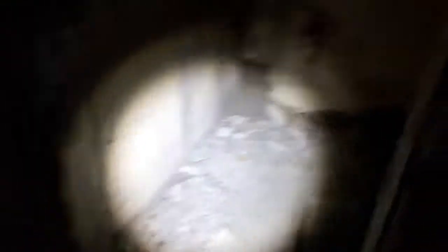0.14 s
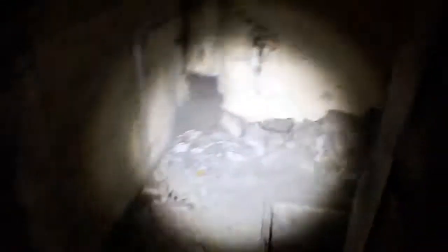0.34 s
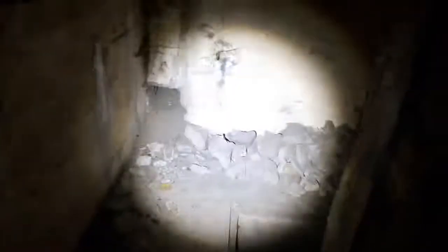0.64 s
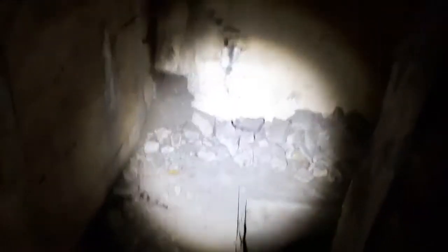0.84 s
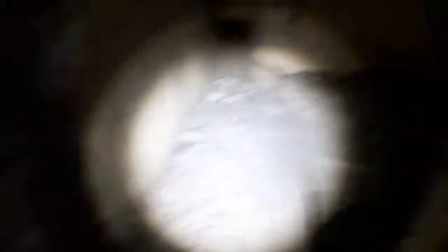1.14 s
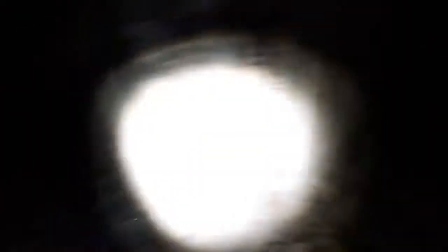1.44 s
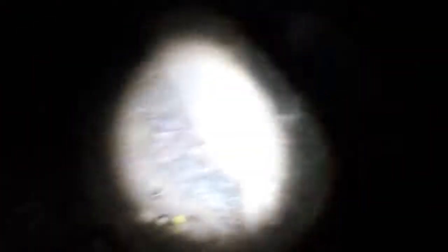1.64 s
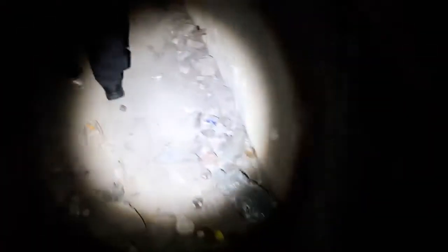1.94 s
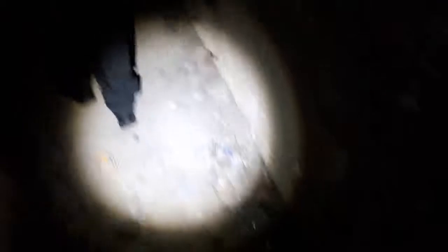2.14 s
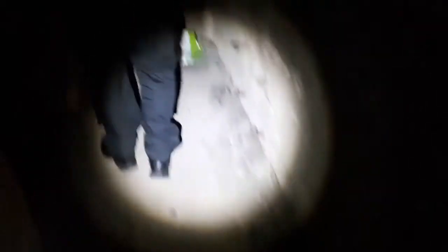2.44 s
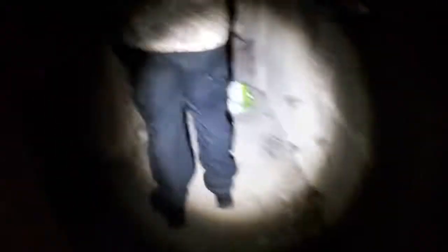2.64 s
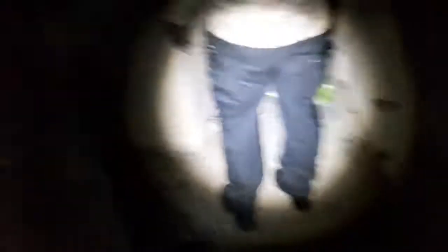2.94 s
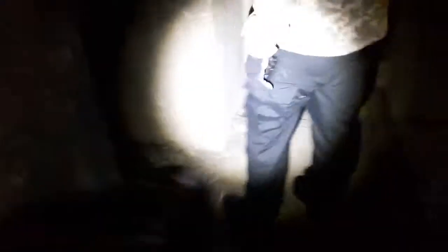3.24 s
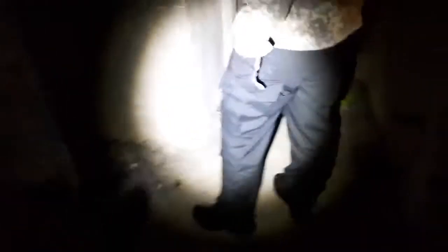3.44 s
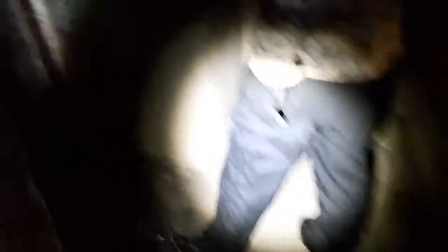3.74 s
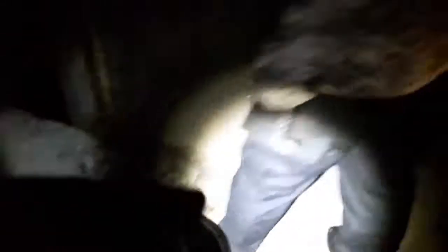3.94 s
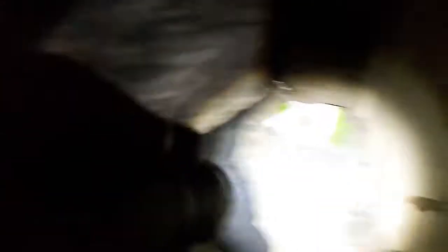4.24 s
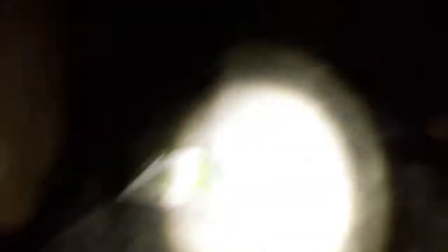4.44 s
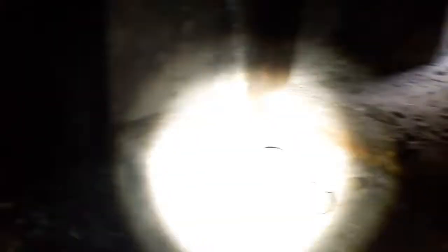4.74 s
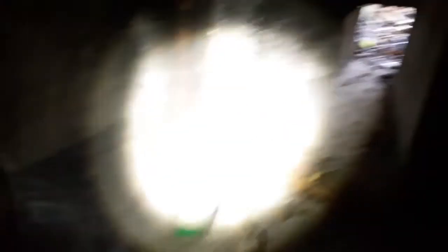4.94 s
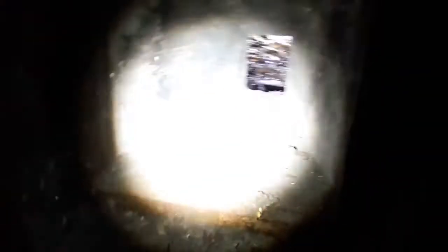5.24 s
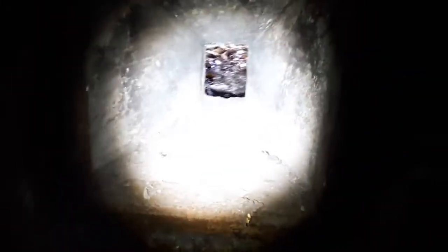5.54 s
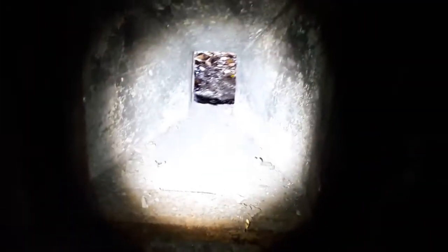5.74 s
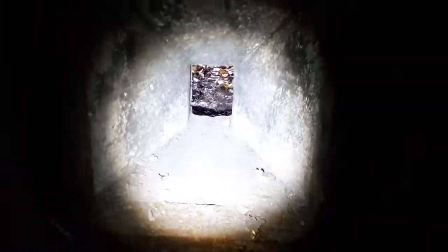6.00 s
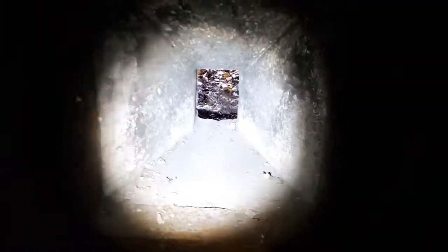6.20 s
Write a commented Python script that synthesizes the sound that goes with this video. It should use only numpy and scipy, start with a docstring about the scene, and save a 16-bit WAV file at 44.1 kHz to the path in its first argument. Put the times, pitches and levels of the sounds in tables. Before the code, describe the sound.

Two people scuff across gritty debris in an echoing concrete room, stones cracking and knocking underfoot over faint rustle and a deep wavering hum.

```python
"""Two people pick their way over rubble in a concrete bunker, one of them holding the microphone.
From the start soles grind grit (random grains), chips snap (noise bursts with a ring) and slabs
knock (struck modes); a sole first slips before 1 s. Dull taps lead into the densest rubble, about
2.7 to 4.1 s, then hard clacks (a click and chatter) come close by and the last steps are fainter.
Bare walls answer the debris; fine rustle and a low hum (two tones over a rumble) run throughout."""
import sys
import numpy as np
from scipy import signal
from scipy.fft import rfft, irfft
from scipy.io import wavfile
from scipy.ndimage import uniform_filter1d

SR = 44100
rng = np.random.default_rng(int(sys.argv[2]) if len(sys.argv) > 2 else 0)


def generate_wav(signal):
    """Clip the signal to [-1, 1] and save it as 16-bit WAV at the path in sys.argv[1]."""
    frames = np.transpose(np.atleast_2d(signal))
    scaled = np.clip(frames, -1, 1) * 32767
    pcm = np.round(scaled).astype(np.int16)
    wavfile.write(sys.argv[1], SR, pcm)


N = 280917

PORT_GAP_M = 0.15  # between the two microphone ports
SOUND_M_PER_S = 343


def undb(db):
    """Decibels to gain."""
    return 10 ** (np.asarray(db) / 20)


def unit(x):
    """Scale to rms 1."""
    return x / np.sqrt(np.mean(x ** 2))


def seconds(size):
    """A time axis."""
    return np.arange(size) / SR


def curve(rows):
    """The gain over time of (t/s, level/dB) points."""
    return undb(np.interp(seconds(N), *np.transpose(rows)))


def walk(rate):
    """Random levels of rms near 1, held 1 / rate s and smoothed twice over that time."""
    hold = int(SR / rate)
    levels = np.repeat(rng.standard_normal(N // hold + 1), hold)
    smooth = uniform_filter1d(uniform_filter1d(levels, hold), hold)
    return unit(smooth[:N])


def paint(x, colour, size=4096):
    """Causal minimum-phase filter with the gains of (f/Hz, level/dB) points."""
    hz, db = np.transpose(colour)
    log_hz = np.log(np.fft.rfftfreq(size, 1 / SR) + 1)
    gain = undb(np.interp(log_hz, np.log(hz), db))
    # folding the cepstrum onto positive time puts the energy as early as possible
    cepstrum = irfft(np.log(gain))[:size // 2]
    cepstrum[1:] *= 2
    response = irfft(np.exp(rfft(cepstrum, size)))
    return signal.fftconvolve(np.atleast_2d(x), response[None], axes=1)[:, :x.shape[-1]]


def ring(hz, t60, size=4096):
    """One struck mode: a sine that decays by 60 dB in t60 seconds."""
    t = seconds(size)
    return np.sin(2 * np.pi * hz * t) * np.exp(-np.log(1000) * t / t60)


def crack(t60, size=4096):
    """A brittle fracture: a noise burst that decays by 60 dB in t60 seconds."""
    return unit(rng.standard_normal(size) * np.exp(-np.log(1000) * seconds(size) / t60))


def grains(rate, spread_db):
    """Randomly timed breaks, rate per second on average: many small, a few large."""
    chance = rng.random(N)
    size = rng.exponential(size=N)
    sign = rng.choice([-1, 1], N)
    return unit((chance < rate / SR) * sign * undb(spread_db * np.minimum(size, 3)))


def diffuse(size):
    """Noise from all sides at two ports: alike in the bass, nearly unrelated in the treble."""
    alike = np.sinc(2 * np.fft.rfftfreq(size, 1 / SR) * PORT_GAP_M / SOUND_M_PER_S)
    spectra = rfft(rng.standard_normal((2, size)))
    mid, side = irfft(spectra * np.sqrt([1 + alike, 1 - alike]), size)
    return unit(np.array([mid + side, mid - side]))


def bunker(x, wet_db, bearing=0, size=32768):
    """The direct sound, quick returns off near walls and a long weak tail; treble dies sooner."""
    early_t60_s, late_t60_s, late_db = 0.16, 0.47, -9.5
    treble_share = 0.34  # decay times of the treble, as a share of those of the bass
    t = seconds(size)
    noise = diffuse(size)
    low = signal.sosfilt(signal.butter(1, 2500, fs=SR, output="sos"), noise)

    def fade(age):
        """Early decay plus the weaker late one."""
        return undb(-60 * age / early_t60_s) + undb(late_db - 60 * age / late_t60_s)

    room = low * fade(t) + (noise - low) * fade(t / treble_share)
    room *= np.minimum(t / 0.00075, 1)
    room *= undb(wet_db) / np.sqrt(np.sum(room ** 2) / 2)  # wet_db is against the direct sound
    # the direct sound reaches the nearer port first; a positive bearing (radians) is to the left
    lag = int(np.sin(bearing) * PORT_GAP_M / SOUND_M_PER_S * SR)
    room[[0, 1], [max(-lag, 0), max(lag, 0)]] += 1
    return signal.fftconvolve(np.atleast_2d(x), room, axes=1)


def add(out, s, hit, db, size=600):
    """Put a hit into the scene, with the rms of its first samples at the given level."""
    start = int(s * SR)
    opening = np.sqrt(np.mean(hit[:, :size] ** 2))
    hit = hit[:, :N - start] * undb(db) / opening
    out[:, start:start + hit.shape[1]] += hit


def grinding(kind, colour, rate, spread_db, wet_db, slip):
    """One size of debris breaks as each sole loads it and lets go, evenly in dB."""
    # presses of a sole: full weight t/s, rise/s, release/s, relative grit level/dB,
    # rubble over grit level/dB, sand over grit level/dB
    presses = [(0.075, 0.064, 0.11, -35.5, -5, -3.5), (0.19, 0.094, 0.17, -43, -7.5, -9.5),
               (0.346, 0.14, 0.086, -47.5, -15, -2.5), (0.855, 0.0043, 0.095, -31.5, -0.5, -5),
               (1.096, 0.11, 0.098, -43, -1.5, -6), (1.296, 0.013, 0.075, -53.5, -1, 2),
               (1.44, 0.17, 0.12, -51, 2, -9), (1.552, 0.077, 0.12, -42.5, 2.5, -3),
               (1.856, 0.024, 0.15, -40.5, -3.5, -2.5), (1.938, 0.11, 0.45, -43.5, -4, -9.5),
               (2.761, .008, 0.11, -39.5, 4.5, -7), (2.853, 0.11, 0.083, -28, 2, -9),
               (2.955, 0.098, 0.19, -48, 6.5, -9.5), (3.819, 0.049, 0.067, -38, 0, 4),
               (3.935, 0.13, 0.084, -37, 8.5, -8), (4.07, 0.077, 0.074, -54.5, 15, -12),
               (5.0, 0.068, 0.2, -49, -5, -1), (5.072, 0.024, 0.071, -51.5, 3.5, -16),
               (5.19, 0.06, 0.27, -56, 1.5, -13), (5.368, 0.053, 0.5, -54, -6, -8),
               (5.8, 0.018, 0.069, -65, 9, -2), (5.865, .07, 0.08, -62, 16, -23),
               (5.925, 0.087, 0.11, -53, 12.5, -9.5)]
    press_range_db = 21.5  # swell during one rise, sinking during one release
    debris = unit(paint(grains(rate, spread_db) * slip, colour))[0]
    t, out = seconds(N), np.zeros((2, N))
    for s, rise_s, release_s, grit_db, rubble_db, sand_db in presses:
        over_grit_db = {"grit": 0, "rubble": rubble_db, "sand": sand_db}[kind]
        start = max(int((s - 2 * rise_s) * SR), 0)
        stop = int((s + 2 * release_s) * SR)
        span = t[start:stop]
        away = np.maximum((s - span) / rise_s, (span - s) / release_s)
        press = undb(grit_db + over_grit_db - press_range_db * away)
        # each press has its own wall returns, as from a new spot
        crunch = bunker(debris[start:stop] * press, wet_db)[:, :N - start]
        out[:, start:start + crunch.shape[1]] += crunch
    return out / np.sqrt(1 + undb(2 * wet_db))  # undo the power the walls add


def slides():
    """Dense sand hisses under a slipping sole, which slows to a halt."""
    # slips: t/s, length/s, level/dB, treble setting/dB
    slips = [(0.847, 0.065, -35, -4), (3.462, 0.19, -49.5, 6.5), (3.643, 0.11, -45.5, -22),
             (3.771, 0.14, -39, 0), (4.977, 0.12, -47, 14)]
    out = np.zeros((2, N))
    for s, length_s, db, treble_db in slips:
        t = seconds(int(length_s * SR))
        sand = grains(5000, 5.1)[:len(t)] * np.sqrt(1 - t / length_s)
        colour = [(300, -10), (1000, 3.5), (2300, 7.0), (3800, -6.0),
                  (8000, treble_db / 2 - 10.5), (10500, treble_db - 16), (15000, treble_db - 14)]
        add(out, s, bunker(paint(sand, colour), wet_db=-4.0, bearing=0.45), db)
    return out


def knocks(gain_db=-7.0, hard_db=9, crack_db=-20):
    """Each loose slab favours modes near its own pitch; a harder contact wakes the high ones."""
    # slab knocks: t/s, relative level/dB, favoured f/Hz, contact hardness/dB, lead near that f/dB
    blows = [(0.543, -24.5, 283, -50, 14), (0.579, -32, 330, -31, 8), (0.765, -16, 757, -18, 12),
             (0.791, -23, 324, -48, 11), (1.529, -29.5, 634, -14, 9), (2.786, -19, 1160, -16, 2),
             (2.817, -15, 820, -5, 10.5), (2.838, -20, 256, -22, 15.5), (2.865, -16.5, 236, -28, -10),
             (2.946, -17, 870, -25, 11), (3.29, -24, 990, -27, 8), (3.312, -14, 385, -25, 9.5),
             (3.547, -15, 476, -26.5, 8.5), (3.824, -9, 567, -22, 15.5), (3.852, -17.5, 714, -3.5, 17),
             (3.915, -20, 500, -8.5, 16), (4.005, -18, 510, -31, 2.5), (4.058, -23, 522, -14, 18),
             (4.489, -37.5, 230, -27, 21), (4.986, -33.5, 1450, -29, 26.5), (5.068, -34.5, 905, 0, 8),
             (5.167, -34, 221, -36, 51), (5.449, -40.5, 1350, -11, -2), (5.851, -31.5, 367, -25, 13),
             (5.915, -35.5, 330, -22, -6)]
    # modes a slab rings with: f/Hz, relative level/dB, t60/s
    modes = [(159, -14, 0.021), (187.4, -11.5, 0.08), (273.5, -9.5, 0.28), (334.5, -3, 0.073),
             (428, -3.5, 0.079), (511, -5.5, 0.12), (631, 2.5, 0.042), (731, 0, 0.059), (890, 9, 0.022),
             (1186, 16, 0.011), (1570, 10.5, 0.02), (2295, 4.5, 0.033), (2800, 9, 0.0043)]
    spread_oct = .35  # how wide a slab's own pitch reaches among its modes
    out = np.zeros((2, N))
    hz, mode_db, t60 = np.transpose(modes)
    for s, db, pitch_hz, hardness_db, focus_db in blows:
        tuned = hz * (1 + .02 * rng.standard_normal(len(hz)))
        near = np.exp(-(np.log2(hz / pitch_hz) / spread_oct) ** 2)
        weights = undb(mode_db + focus_db * near)
        # alternating signs between neighbouring modes
        body = unit(sum((-1) ** k * weights[k] * ring(tuned[k], t60[k]) for k in range(len(hz))))
        colour = [(650, 0.0042), (1900, hardness_db + hard_db), (3000, hardness_db + hard_db - 0.5),
                  (9000, hardness_db + 7), (15000, hardness_db + 1)]
        blow = paint(body + undb(crack_db) * crack(0.029), colour)
        bearing = rng.uniform(-0.16, 0.074)
        add(out, s, bunker(blow, wet_db=0.5, bearing=bearing), db + gain_db)
    return out


def snaps(gain_db=-14, treble_db=3):
    """Chips break under a sole with a dry tick and ring for a few milliseconds."""
    # breaking chips: t/s, relative level/dB, pitch f/Hz, relative treble/dB
    chips = [(0.0693, -18.5, 1530, -19), (0.8507, -33, 1580, -21), (1.0161, -30.5, 2270, -18),
             (1.243, -42.5, 2650, -19), (1.439, -30, 1930, -30), (1.48, -31.5, 1160, -15),
             (1.8556, -21, 2780, 3), (1.8803, -26, 2110, -6), (2.0053, -26, 2330, -4),
             (2.0833, -29.5, 1270, -5), (2.103, -30.5, 1380, -24), (2.164, -26.5, 2200, -12),
             (2.212, -30, 1000, -1.5), (2.7392, -20, 1170, 3), (2.851, -12, 2970, -23),
             (2.912, -20, 2470, -12), (2.9818, -24.5, 2800, -28), (3.1432, -23.5, 1400, -12.5),
             (3.2105, -28, 1650, -18), (3.8211, -17.5, 1290, -20), (3.855, -20, 1390, -33),
             (3.8855, -22.5, 1210, 3), (4.2648, -26.5, 1530, -67), (4.2815, -26.5, 1520, -13),
             (4.7535, -31, 1220, 3), (5.3632, -36.5, 1990, -33)]
    out = np.zeros((2, N))
    for s, db, pitch_hz, bright_db in chips:
        top_db = min(bright_db + treble_db, 6)
        chip = crack(.01) + undb(-6) * unit(ring(pitch_hz, .009))
        colour = [(250, -36), (900, -0.5), (2900, 1), (4000, -2.5),
                  (7000, top_db - 5.0), (15000, top_db - 16)]
        chip = paint(chip, colour)
        bearing = rng.uniform(-0.46, 0.55)
        add(out, s, bunker(chip, wet_db=-2.5, bearing=bearing), db + gain_db)
    return out


def clacks(gain_db=-8.5):
    """One sharp, bright contact close by, with a brief chatter, then the walls."""
    # hard contacts near the microphone: t/s, relative level/dB
    contacts = [(4.3572, -40), (4.3716, -20), (4.3901, -18), (4.7996, -20), (4.8761, -25)]
    # their colour: f/Hz, level/dB
    colour = [(100, -20), (300, -9), (800, 1), (1500, 2), (2600, 1), (3300, -12), (4800, -7), (7000, -15),
              (9000, -7), (11000, -7), (13000, -6), (16000, -10)]
    out = np.zeros((2, N))
    for s, db in contacts:
        contact = crack(.006) / 150
        contact[0] += 1
        add(out, s, bunker(paint(contact, colour), wet_db=2, bearing=0.35), db + gain_db)
    return out


def taps(gain_db=-9, pitch_hz=280, t60=0.0097):
    """Small dull taps close by, each dead within a few cycles."""
    # faint taps: t/s, relative level/dB
    touches = [(2.4178, -43), (2.448, -46.5), (2.49, -42), (2.528, -44), (2.561, -40.5), (2.655, -46),
               (2.698, -54)]
    out = np.zeros((2, N))
    for s, db in touches:
        tap = unit(ring(pitch_hz, t60)) + undb(7) * crack(0.0028)
        dull = paint(tap, [(1500, 0), (6000, -22)])
        add(out, s, bunker(dull, wet_db=-19), db + gain_db)
    return out


def rustle(gain_db=4, flicker_db=2, count=3):
    """Clothes and shuffling feet: fine random grains, each stream with its own wall returns."""
    # rustle between the steps: t/s, relative level/dB
    movement = [(0.0, -42.5), (0.47, -60), (0.6, -50.5), (1.0, -54), (1.2, -61), (1.4, -54), (2.3, -61),
                (2.52, -53.5), (2.7, -59), (3.15, -56.5), (3.7, -48), (4.2, -51.5), (4.7, -49),
                (5.1, -57.5), (6.37, -64)]
    # its colour: f/Hz, level/dB
    colour = [(90, -25), (170, -6), (280, -3), (500, -7), (1000, -10), (1700, -14), (2600, -14),
              (3500, -20), (8000, -25), (10000, -30), (16000, -31)]
    spots = sum(bunker(grains(500, 5.1), wet_db=5)[:, :N] for _ in range(count))
    fibres = unit(paint(spots, colour))
    return fibres * curve(movement) * undb(gain_db + flicker_db * walk(23.33))


def hum(base_db=-2, octave_db=0, rumble_db=-2):
    """A wavering, throbbing low tone and its octave over a dull rumble that swells with it."""
    # the tone and the rumble: t/s, relative level/dB
    swell = [(0.1, -51), (1.39, -51.5), (2.82, -43.5), (6.03, -49), (6.2, -51.5)]
    # the octave: t/s, relative level/dB
    octave_swell = [(0.0, -75), (2.4, -62), (2.89, -71), (4.45, -60), (5.13, -54), (6.37, -55.5)]
    # colour of the rumble: f/Hz, level/dB
    colour = [(20, -44.5), (35, -4), (47, -3), (60, 11.5), (78, 1), (100, 3), (135, -12.5), (200, -9.5),
              (400, -40.5)]
    mean_hz = 62.8
    phase = 2 * np.pi * np.cumsum(mean_hz * (1 + .02 * walk(7))) / SR
    throb = undb(1.5 * walk(12))
    base = undb(base_db) * curve(swell) * np.sin(phase)
    octave = undb(octave_db) * curve(octave_swell) * np.sin(2 * phase)
    rumble = unit(paint(diffuse(N), colour)) * curve(swell)
    return np.sqrt(2) * (base + octave) * throb + undb(rumble_db) * rumble


def scene():
    """Three sizes of debris under the soles, the single hits and the room's own sound."""
    # colours of the three sizes of debris: f/Hz, level/dB
    rubble_colour = [(60, -28), (110, -4.5), (165, 3), (230, -0.5), (400, 4), (900, -3.5), (1300, -3.5),
                     (2000, -13.5), (4000, -53.5)]
    grit_colour = [(300, -18), (900, 4), (1500, -2.5), (2100, 2), (2900, -4), (3600, -6), (5000, -10.5),
                   (7000, -53), (12000, -31.5)]
    sand_colour = [(2000, -52), (5000, 2.5), (8000, 5), (10000, -5.5), (13000, 0), (16000, -16.5)]
    # a sole sticks and slips, so all debris breaks in the same short spurts
    slip = undb(3 * walk(110))
    rubble = grinding("rubble", rubble_colour, rate=500, spread_db=2.5, wet_db=0, slip=slip)
    grit = grinding("grit", grit_colour, rate=900, spread_db=4, wet_db=-1, slip=slip)
    sand = grinding("sand", sand_colour, rate=2200, spread_db=5, wet_db=0, slip=slip)
    steps = undb(2.0) * rubble + undb(0.36) * grit + undb(-4.0) * sand
    return steps + slides() + knocks() + snaps() + clacks() + taps() + rustle() + hum()


def record(dry):
    """The left microphone port is shaded, most in the low treble; the top is cut."""
    # left minus right: f/Hz, level/dB
    ports = [(60, -2.4), (250, -1), (500, -1.7), (1000, -2.8), (2200, -7.5), (4000, -6.5), (8000, -3.5),
             (14000, -2.3)]
    top_hz = 15900
    sides = []
    for x, sign in zip(dry, (1, -1)):
        shading = [(hz, sign * db / 2) for hz, db in ports]
        sides.append(paint(x, shading)[0])
    return signal.sosfilt(signal.ellip(8, .2, 70, top_hz, fs=SR, output="sos"), sides)


dry = scene()
out = record(dry)
generate_wav(out)
```